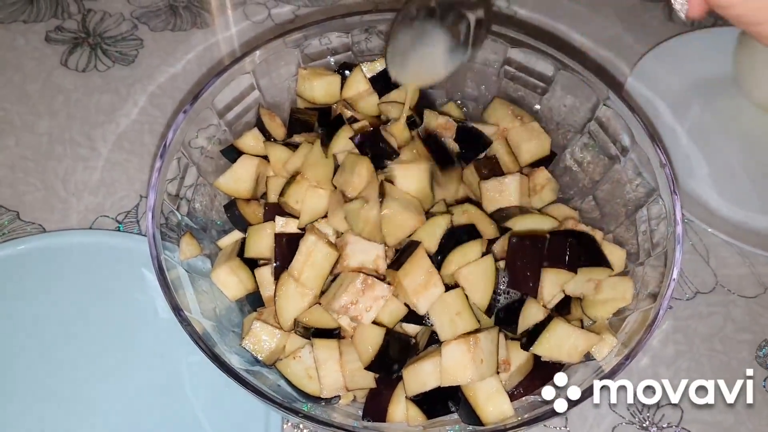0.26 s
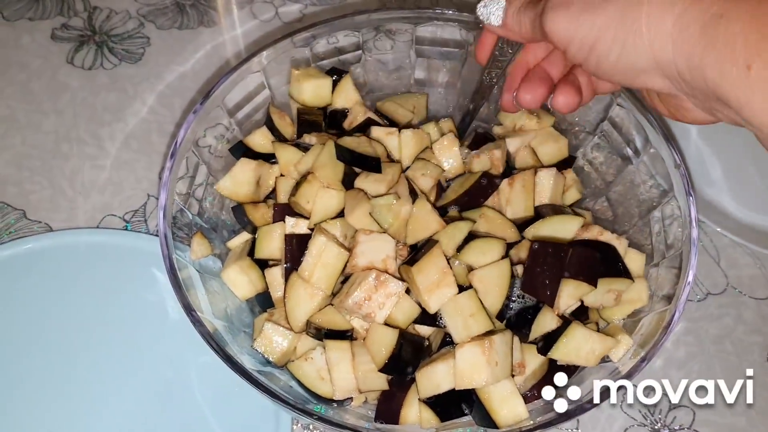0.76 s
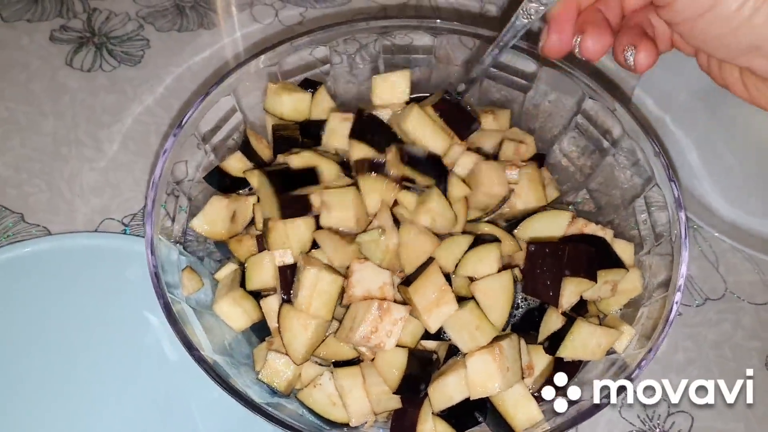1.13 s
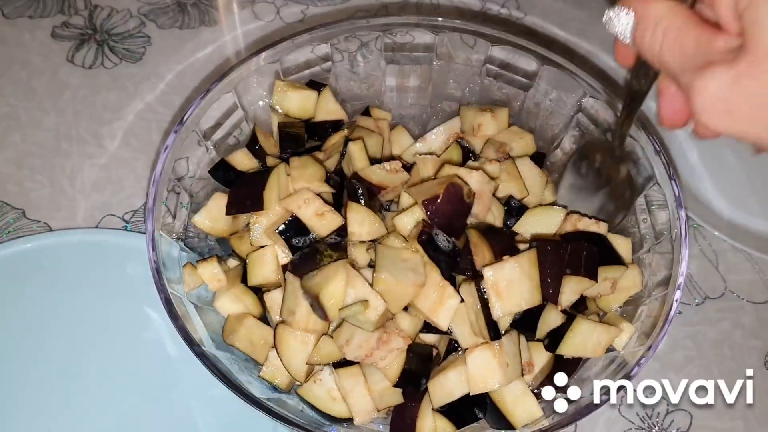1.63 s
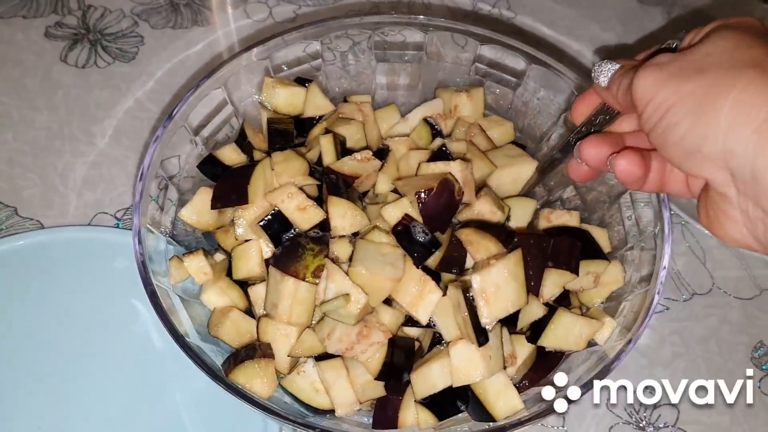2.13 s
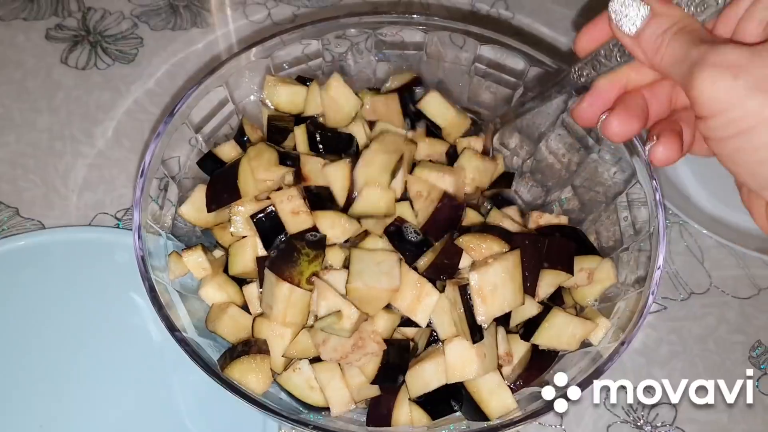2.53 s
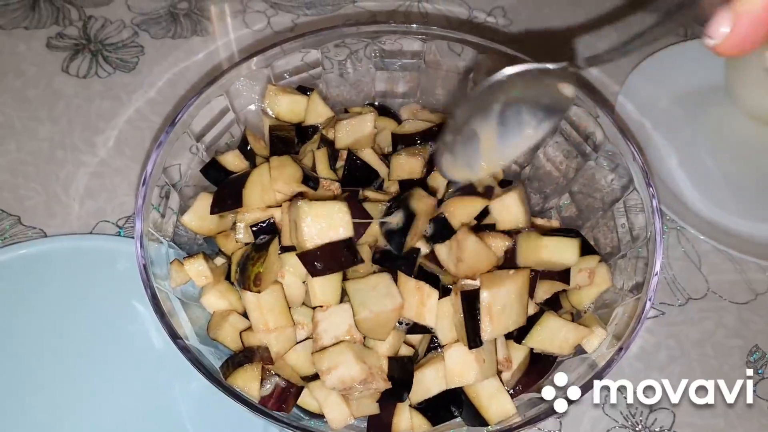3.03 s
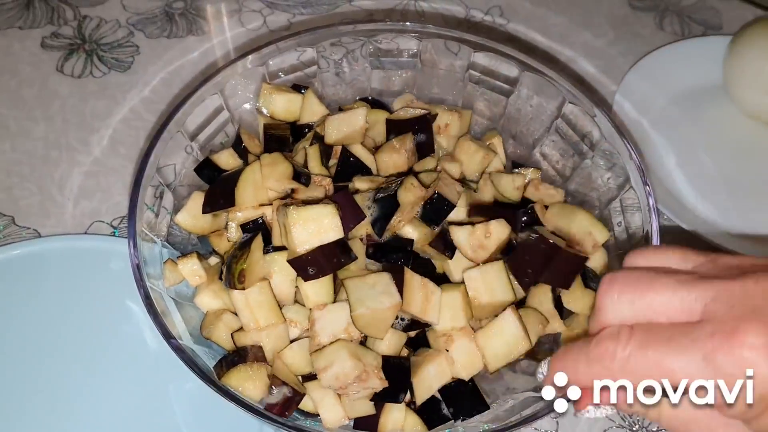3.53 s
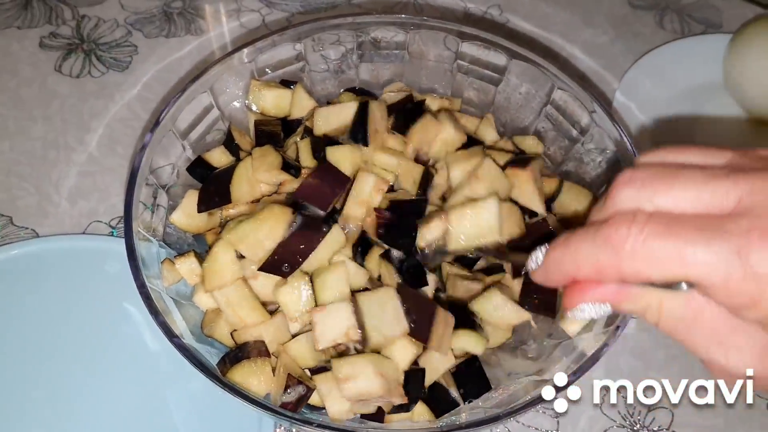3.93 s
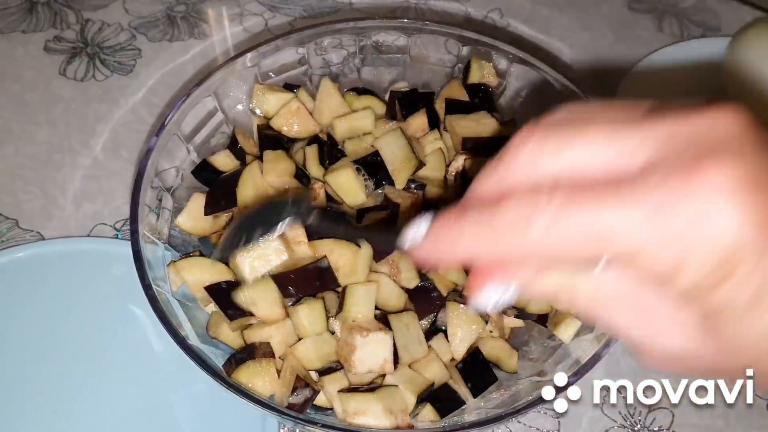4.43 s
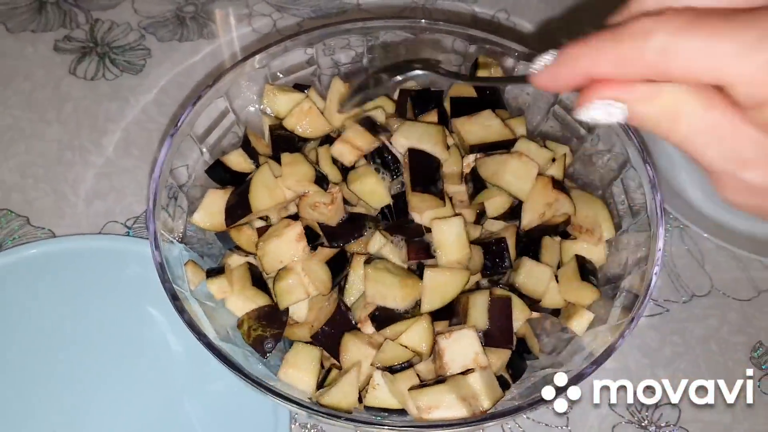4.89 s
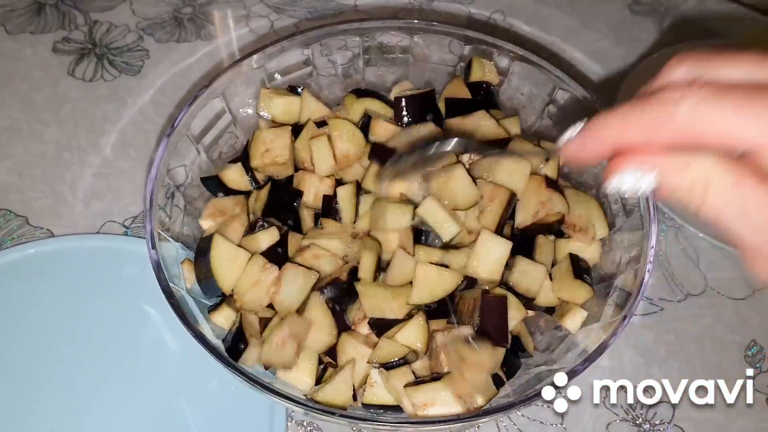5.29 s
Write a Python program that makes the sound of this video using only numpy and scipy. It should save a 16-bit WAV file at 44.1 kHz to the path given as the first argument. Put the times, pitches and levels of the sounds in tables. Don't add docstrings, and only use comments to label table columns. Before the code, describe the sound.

Phone-close stereo capture of stirring: irregular spoon blows on food-damped glass, some bright with a steely edge, some low and heavy, each briefly answered by the room. Moist shuffling, small taps and dropping cubes fill the gaps, busiest around three and a half seconds. After a last medium knock near four and a half seconds, only quiet, wet stirring and faint touches remain over soft hum.

```python
import sys
import numpy as np
from scipy import signal
from scipy.fft import rfft, irfft
from scipy.io import wavfile
from scipy.ndimage import uniform_filter1d

SR = 44100
rng = np.random.default_rng(int(sys.argv[2]) if len(sys.argv) > 2 else 0)


def to_wav(s):
    ch = np.atleast_2d(s).T
    pcm = np.round(np.clip(ch, -1, 1) * 32767)
    wavfile.write(sys.argv[1], SR, pcm.astype(np.int16))


def field_ratio(decibels):
    return 10 ** (np.asarray(decibels, dtype=float) / 20)


N = 244755

# (frequency [Hz], level [dB])
AIR_TONE = [(60, -13.5), (110, -18), (175, -27.5), (300, -30), (520, -15.5), (900, -34.5), (1900, -49.5),
            (2800, -43.5), (4500, -39.5), (6000, -44.5), (7600, -53), (9500, -40.5), (15800, -70.5)]
AIR_DB = -57
# (frequency [Hz], width [Hz], level [dB], steadiness [0-1])
WHINES = [(302, 160, -61.5, 0), (1020, 250, -80, 0.06), (2440, 230, -83.5, .05), (3120, 350, -80, .05),
          (5780, 150, -92.5, 0.1), (14510, 400, -88.5, 0.1)]
# (frequency [Hz], width [Hz], steadiness [0-1])
BOOM_MODES = [(48.6, 3.2, 0.9), (103.7, 36, 0.07)]
# (time [s], level [dB])
DRONE = [(0, -50.5), (.22, -53), (.4, -55.5), (1.2, -64.5), (1.55, -55.5), (2.1, -54.5), (2.55, -52),
         (3, -48.5), (3.3, -52.5), (3.8, -50), (3.9, -51.5), (4.4, -55.5), (4.84, -43.5), (5.15, -58.5),
         (5.4, -50), (5.55, -80.5)]
DRONE_UPPER_DB = -59
# (order [1], level [dB])
SHAFT_ORDERS = [(6, -68), (11, -76), (12, -85), (13, -81), (14, -83), (15, -85), (16, -86), (18, -86),
                (20, -84), (21, -86), (22, -80), (24, -86), (25, -88), (28, -88), (48, -90), (49, -83),
                (50, -93), (51, -92), (53, -94), (61, -92), (62, -88), (63, -86), (64, -89), (65, -84),
                (66, -87), (74, -91), (75, -95), (83, -94), (119, -96)]
SHAFT_HZ, SHAFT_DB, SHAFT_WOBBLE_DB = 48.99, 0, 4

# (time of full effort [s], length [s], cubes sliding [dB], wetness [dB], weight of heap [dB])
STROKES = [(0.144, 0.3, -58, -10.5, 0), (0.621, 0.097, -45, -16.5, 7), (0.963, 0.28, -56, -15.5, 0),
           (1.443, 0.74, -64, -10, 0.5), (1.717, 0.044, -39.5, -13, -1), (1.857, 0.085, -54.5, -10, 12.5),
           (2.153, 0.51, -66, -33, 11), (2.504, 0.83, -64, -11, 3), (3.257, 0.4, -78.5, -25, 23),
           (3.393, 0.06, -37, -17, -5), (3.54, 0.13, -49.5, -15, 0), (3.608, 0.1, -73, -27.5, 5),
           (3.91, 0.17, -60.5, -11, -8), (4.124, 0.33, -62, -8, -1.5), (4.675, 0.18, -55, -6.5, 4),
           (5.073, 0.12, -76.5, -18.5, 0), (5.229, 0.26, -56.5, -8.5, -13), (5.51, 0.81, -79, -10, 25)]
STROKE_RISE, STROKE_FADE_DB = 0.49, -6
HEAP_LAG = 1.17
# (frequency [Hz], level [dB])
SLIDE_TONE = [(500, -34), (800, -5), (1300, -2.5), (2500, -10), (4200, -12), (6000, -23)]
# (frequency [Hz], level [dB])
FIZZ_TONE = [(4000, -32), (6000, 4.5), (7600, 1), (10000, 2.5), (13000, 0.5), (15500, -1.5)]
# (frequency [Hz], level [dB])
HEAP_TONE = [(120, -35.5), (200, 10), (290, 15.5), (450, -10), (700, -16.5)]

# (time [s], level [dB], centre [Hz])
SNAPS = [(0.047, -62, 10600), (0.0992, -61, 12300), (0.126, -46.5, 14000), (0.2114, -56, 9100),
         (0.306, -51, 10100), (1.3622, -42, 6740), (1.417, -64.5, 9400), (1.4412, -44.5, 13660),
         (1.477, -51, 10500), (1.526, -51, 12200), (1.5474, -50, 13400), (2.4613, -50, 12250),
         (3.89, -51, 9700), (3.9597, -64, 9540), (4.0894, -50, 12900), (4.2, -50, 12670),
         (4.23, -60, 12060), (4.2503, -46, 11000), (4.81, -47.5, 7340), (5.2303, -41, 14860)]
# (time [s], level [dB], centre [Hz], wet snap [dB], length [ms])
SCRAPES = [(0.237, -37.5, 1060, -11.5, 6.6), (0.344, -42.5, 1533, -16.5, 3.5), (0.978, -33, 930, -19.5, 23),
           (1.557, -43.5, 1153, -24, 22), (2.133, -35.5, 970, -58, 12), (2.369, -38.5, 2250, -13.5, 12),
           (2.377, -31.5, 1510, -7, 7.9), (2.58, -44, 1105, -12.5, 140), (2.819, -46, 694, -8, 21),
           (3.982, -47, 1157, -18, 20), (4.106, -40.5, 2410, -8.5, 7.6), (5.035, -46, 900, -27, 46),
           (5.055, -42.5, 1094, 4, 26), (5.159, -42.5, 1010, -6, 91), (5.222, -55, 1970, -7, 45),
           (5.521, -45, 1190, -5.5, 68)]

# (time [s], blow [dB], steel crack [dB], room share [dB], clack between modes [dB])
KNOCKS = [
    (0.506, -11, -15, -2.5, -28.5),
    (0.7138, 2, -37, -3.5, -8.5),
    (1.644, -2, -9, -3, -12),
    (1.888, -4, -35, -2.5, -10),
    (3.329, 0, -14.5, -7, -22),
    (3.578, -7.5, -41.5, 1.5, -15),
    (4.576, -8.5, -20.5, -2, -15),
    (5.279, -26.5, -28.5, -5.5, -13),
]
# (frequency [Hz], width [Hz], level [dB])
WALL_SPOTS = [
    [(520, 41, 4), (740, 58, 3.5), (930, 19, 7.5), (1220, 92, 0), (1580, 110, 1.5), (1876, 100, -3.5),
     (2730, 1600, -8), (3846, 170, -12), (4390, 170, -6), (5460, 100, -10.5)],
    [(513.4, 110, 11), (814, 51, 5), (1560, 140, 6.5), (2609, 56, -3.5), (3138, 260, 1.5), (3690, 500, -2),
     (1993, 300, -13), (1200, 200, -15), (946, 53, 5)],
    [(493, 110, 9), (746, 240, 0.5), (1982, 120, -2.5), (2583, 95, -5), (3060, 210, -9.5), (3830, 720, -7),
     (1630, 90, -5), (4340, 84, -12.5), (4830, 75, -18.5)],
    [(413, 180, 1), (719, 37, 6), (1060, 126, -1), (2064, 156, 2), (2400, 140, -6), (2590, 88, -7.5),
     (546, 145, 0), (3300, 290, -10), (4280, 494, -13), (3730, 90.4, -18), (4660, 73, -16),
     (5420, 150, -16.5)],
]
# (frequency [Hz], width [Hz], level [dB])
FLOOR_SPOTS = [
    [(284, 77, -1), (450, 98, 1.5), (1090, 270, 2), (1380, 120.3, -14.5), (1720, 150, 0.5),
     (2470, 160, -16.5), (3030, 250, -24), (3800, 700, -24.5)],
    [(526, 91, 5.5), (735.6, 25, 7.5), (1110, 310, -2.5), (1740, 69, 0.5), (2436, 360, -4.5),
     (3600, 480, -16), (4600, 680, -27)],
    [(264, 36, -1.5), (725, 43, 5.5), (930, 96, -7), (1640, 60, -1), (2160, 86, -9.5), (3020, 205, -19.5),
     (4570, 480, -30.5)],
    [(287, 36, 10), (513, 190, 3), (1060, 110, 5), (1464, 110, -23), (1940, 190, -8), (2380, 59, -12),
     (3920, 300, -30)],
]
# (frequency [Hz], level [dB])
CLACK_TONE = [(120, -26.5), (200, -4.5), (320, 9), (900, 3.5), (2200, 1.5), (4000, -10), (5200, -15.5),
              (7500, -52.5)]
# (frequency [Hz], level [dB])
CRACK_TONE = [(3500, -19), (5300, 1.5), (6100, -1), (7500, -2), (9500, 1.5), (12400, -2.5), (15500, -5),
              (16500, -22.5)]
TAIL_TILT_DB = 0.2
# (frequency [Hz], width [Hz])
SPREAD = [(550, 630), (3200, 2300)]

# (time [s], slow sway [dB], quick thump [dB])
JOLTS = [
    (0.506, -45, -39.5),
    (0.715, -37, -24.5),
    (1.646, -43.5, -35.5),
    (1.888, -38.5, -30.5),
    (2.07, -58.5, -36),
    (2.225, -59.5, -39.5),
    (3.327, -43, -31.5),
    (3.58, -44.5, -31.5),
    (4.573, -52.5, -40.5),
    (5.188, -55, -45),
]
SWAY_S, THUMP_S, THUMP_HZ = 0.072, 0.12, 105

# (time [s], level [dB], t60 [s])
SLIDES_DOWN = [
    (0.511, -39.5, 0.48),
    (1.652, -38, 0.73),
    (3.338, -33.5, 0.48),
    (4.584, -42, 0.29),
]
# (frequency [Hz], width [Hz], level [dB])
RINGS = [
    [(940, 49.9, -1), (1237, 46, -24.5), (1478, 44, -23), (1803, 72, -13), (2990, 170, -14),
     (3650, 44.6, -14), (5080, 29, -16.5)],
    [(490, 33, -5.5), (980, 150, -7), (1570, 71, -13), (2185, 250, -15.5), (2680, 100, -7),
     (2974, 160, -10), (3523, 120, -12.5), (4060, 160, -24.5), (5070, 68, -16)],
    [(526, 30, -3), (737, 19, -6), (900, 47, -5), (1190, 35, -18.5), (1900, 220, -9.5), (2387, 26, -9),
     (3000, 67, -10), (3920, 32, -16), (4420, 56, -15.5), (5120, 87, -19)],
    [(733, 14, -9), (1420, 58, -21), (2050, 72, -6), (2460, 32, -4.5), (2600, 69, -2.5), (3080, 110, -5),
     (4100, 240, -19), (4700, 33, -18.5), (5150, 26, -20.5)],
]
WET_DAMPING_HZ = 110

# (time [s], level [dB], ring [Hz],
# wet snap [dB], ring width [Hz])
GRAZES = [(0.572, -25.5, 1800, -16, 300), (0.696, -28.5, 2600, -29.5, 770), (3.561, -36.5, 1720, -22, 400),
          (4.538, -37.5, 2024, -3, 2524), (1.646, -19, 12500, -30, 3000), (1.631, -56, 12000, -10.5, 6000),
          (5.281, -48, 7700, -29, 6000), (5.288, -52, 4900, -20, 4000), (5.093, -52, 5000, -20, 3000),
          (3.645, -44, 3700, -30.5, 2200), (3.692, -46, 3200, -30, 840)]
# (time [s], level [dB], ring [Hz], wet snap [dB])
TAPS = [(0.67, -23.5, 1300, -14), (0.75, -33.5, 1060, -25.5), (1.166, -43.5, 1060, -14),
        (2.411, -39.5, 1000, -24), (3.1, -45.5, 2094, -8), (3.279, -32.5, 910, -12.5),
        (3.474, -32, 1630, -52), (3.473, -39.5, 3000, -40.5), (3.482, -33.5, 1900, -34),
        (3.481, -29.5, 1900, -24), (3.502, -32.5, 670, -21.5), (3.521, -35.5, 1900, -34),
        (3.511, -30.5, 700, -48.5), (3.647, -27, 916, -60), (3.91, -36.5, 1166, -24),
        (6.4, -46.5, 2000, -34), (5.222, -48, 2380, -11), (1.779, -32, 1490, -20.5),
        (1.814, -35.5, 1050, -14), (3.441, -29, 1900, -34), (3.416, -27, 520, -37), (3.692, -30, 860, -52),
        (3.617, -27, 910, -53)]
TAP_WIDTH_HZ, UPPER_DB, UPPER_PER_SNAP = 360, -18, 0.21
# (time [s], level [dB], ring [Hz])
PLOPS = [(0.58, -27, 1620), (0.695, -8.5, 1090), (0.994, -43, 960), (1.027, -51, 960), (1.047, -47.5, 1270),
         (1.133, -51, 1220), (1.146, -50, 1030), (1.166, -49, 1060), (1.208, -57, 900), (2.132, -42, 756),
         (2.556, -49, 1020), (2.613, -53, 1100), (2.632, -54, 1150), (2.654, -53, 1164), (3.279, -39, 1584),
         (3.401, -32, 756), (3.442, -35, 1830), (3.523, -39, 1630), (3.69, -28.5, 1616), (5.036, -51, 1250),
         (5.05, -50, 1160), (5.056, -49, 1110), (5.063, -58, 1380), (5.074, -56, 1110), (5.119, -62, 1410),
         (5.133, -52, 1020), (5.157, -50.5, 1860), (5.163, -52, 1080), (5.294, -54, 1135),
         (5.315, -52, 1100), (5.402, -56, 1060), (5.518, -50.5, 1170)]
PLOP_T60_S, PLOP_RISE_MS = 0.022, 0.5
# (time [s], pitch [Hz], level [dB])
SQUEAK = [
    (1.85, 930, -57.5),
    (1.853, 930, -35),
    (1.859, 1086, -32.5),
    (1.864, 1145, -36.5),
    (1.868, 1140, -45),
    (1.872, 1140, -43),
    (1.879, 1130, -58.5),
]
FLUTTER_HZ, FLUTTER_RAD = 147, 0.64

# (time [s], level [dB], ring [Hz], push brightness [Hz])
THUDS = [
    (2.072, -35.5, 260.4, 481),
    (2.226, -41, 264, 440),
    (3.196, -59.5, 208, 450),
    (3.514, -46, 339, 522),
    (5.189, -59, 264, 450),
    (5.283, -52.5, 257, 408),
]
# (time [s], level [dB], ring [Hz], push brightness [Hz])
LATE_THUD = (2.374, -47, 255, 400)
FOOT_HZ, TABLE_T60_S = 689, 0.048
TABLE_PAIR, TABLE_PAIR_DB = 1.227, -6.5

# (frequency [Hz], likeness [-1 to 1])
SAME = [(60, .995), (180, .98), (300, .9), (640, .3), (1400, .15), (4000, .06), (15000, .02)]
# (frequency [Hz], right port lag [rad])
LAG = [(400, 0), (560, .2), (720, 1.3), (1000, .6), (1400, .6), (2000, 1.9), (2600, .4), (4000, 1.2),
       (9000, .8)]
# (delay [ms], level [dB])
ECHOES = [(.8, -21.5), (1.6, -16), (2.6, -16.5), (4.5, -20), (7, -21), (9.5, -12.5), (14, -22)]
GAP_HZ, GAP_Q = 4000, 9.9
# (frequency [Hz], t60 [s])
KITCHEN_T60 = [(80, 0.53), (300, 0.33), (1000, 0.4), (3000, 0.42), (7000, 0.55), (15000, 0.25)]
# (frequency [Hz], level [dB])
KITCHEN_TONE = [(80, -11), (300, 1.5), (1000, -5.5), (3000, -4.5), (7000, -0.5), (15000, -5)]
# (frequency [Hz], left minus right [dB])
PORTS = [(60, 1.5), (150, -2.5), (380, -2), (700, -0.5), (1300, 4), (2800, 3), (3850, 6.5), (6000, 4.5),
         (8000, 5.5), (10000, 5), (15000, 17)]
# (frequency [Hz], level [dB])
MIC_EDGES = [(30, -17), (42, 0), (15600, -1.5), (16200, -18), (17200, -55.5)]


def evened(x):
    return x / np.sqrt(np.mean(x ** 2) + 1e-20)


def read(points, hz):
    f, value = np.transpose(points)
    return np.interp(np.log(hz + 1), np.log(f + 1), value)


def likeness(hz, lowest=-1):
    same = np.clip(read(SAME, hz), lowest, 1)
    return same, np.sqrt(1 - same ** 2)


def add(mix, s, sound):
    part = mix[max(round(s * SR), 0):][:len(sound)]
    part += sound[:len(part)]


def curve(rows, column):
    rows = np.array(rows)
    return field_ratio(np.interp(np.arange(N) / SR, rows[:, 0], rows[:, column]))


def swell(rows, rise_s, fall_s, fade_db):
    t = np.arange(0, N + 64, 64) / SR
    u = t - rows[:, :1]
    u = np.where(u < 0, -u / rise_s, u / fall_s)
    power = field_ratio(2 * (rows[:, 1:2] + fade_db * u ** 1.42)).sum(axis=0)
    return np.interp(np.arange(N) / SR, t, np.sqrt(power))


def ring(hz, t60, rise_ms):
    t = np.arange(6000) / SR
    return np.sin(2 * np.pi * hz * t) * field_ratio(-60 * t / t60) * (1 - np.exp(-t * 1000 / rise_ms)) ** 2


def wander(x, width):
    r = np.exp(-np.pi * width / SR)
    once = signal.lfilter([1], [1, -r], x, axis=0)
    return signal.lfilter([1], [1, -r], once, axis=0)


def noise(tone, patchy_db, flicker_db):
    frames, hz = N // 128 + 5, np.fft.rfftfreq(512, 1 / SR)
    a, b, c, d, patches = rng.standard_normal((frames, 257, 5)).T
    patches = uniform_filter1d(patches, size=8, axis=0)
    patches = evened(uniform_filter1d(patches, size=10, axis=1))
    flicker = np.minimum(rng.exponential(1, frames), 3.5) - 1
    same, apart = likeness(hz[:, None])
    left = a + 1j * b
    z = np.array([left, same * left + apart * (c + 1j * d)])
    inside = (hz >= tone[0][0]) & (hz <= tone[-1][0])
    level_db = read(tone, hz)[:, None] + patchy_db * patches + flicker_db * flicker
    z *= inside[:, None] * field_ratio(level_db)
    return evened(signal.istft(z, nperseg=512, noverlap=384)[1][:, :N])


def fuzzy_tone(hz, width, steady):
    same, apart = likeness(hz, lowest=0)
    a, b = rng.standard_normal((N, 2, 2)).T
    z = wander((a + 1j * b).T, width).T
    z = z / abs(z) ** np.clip(steady, 0, 1)
    left, other = (z * np.exp(2j * np.pi * hz * np.arange(N) / SR)).real
    return evened(np.array([left, same * left + apart * other]))


def struck(modes, fill_db, crack_db, tilt_db=0):
    hz = abs(np.fft.fftfreq(4096, 1 / SR))
    power = sum(field_ratio(2 * db) / (1 + (2 * (hz - f) / width) ** 2) ** 1.5 for f, width, db in modes)
    softness = field_ratio(-.1 * (crack_db + 17.5))
    power = power + field_ratio(2 * read(CLACK_TONE, hz * softness) + 2 * fill_db)
    power *= field_ratio(2 * tilt_db * np.log2(np.clip(hz, 300, 5000) / 1000))
    power += field_ratio(2 * (read(CRACK_TONE, hz) + crack_db))
    minimum_phase = np.exp(np.conj(signal.hilbert(np.log(power) / 2)))
    reply = np.fft.ifft(minimum_phase).real[:2048]
    return reply / abs(reply).max()


def background():
    air = field_ratio(AIR_DB - 8) * noise(AIR_TONE, 0.36, .3)
    whines = sum(field_ratio(db) * fuzzy_tone(hz, width, steady) for hz, width, db, steady in WHINES)
    low = np.hypot(curve(DRONE, column=1), sway()) * fuzzy_tone(*BOOM_MODES[0])
    upper = (field_ratio(DRONE_UPPER_DB) + 0.71 * sway()) * fuzzy_tone(*BOOM_MODES[1])
    return air + whines + low + upper + thumps()


def compressor():
    order, db = np.transpose(SHAFT_ORDERS)[:, :, None]
    phase, lag, drift, pace = rng.random((len(order), 4)).T[:, :, None]
    t = np.arange(N) / SR
    breath = np.sin(2 * np.pi * ((0.48 + 1.6 * pace) * t + drift))
    gain = np.sqrt(2) * field_ratio(db + SHAFT_DB + SHAFT_WOBBLE_DB * breath)
    turn = 2 * np.pi * (SHAFT_HZ * order * t + phase)
    left = (gain * np.sin(turn)).sum(axis=0)
    right = (gain * np.sin(turn + 1.8 * (lag - .5))).sum(axis=0)
    return np.array([left, right])


def stirring():
    s, length, db, wet_db, heap_db = np.transpose(STROKES)[:, :, None]
    rise, fall = STROKE_RISE * length, (1 - STROKE_RISE) * length
    slide = swell(np.hstack([s, db]), rise, fall, STROKE_FADE_DB)
    fizz = swell(np.hstack([s, db + wet_db]), rise, fall, STROKE_FADE_DB)
    heap = swell(np.hstack([s, db + heap_db]), HEAP_LAG * rise, HEAP_LAG * fall, STROKE_FADE_DB)
    return slide * noise(SLIDE_TONE, 2.5, 3) + fizz * noise(FIZZ_TONE, 2, 4) + heap * noise(HEAP_TONE, 3.5, 1.5)


def snap(hz, width, t60):
    t = np.arange(512) / SR
    burst = rfft(rng.standard_normal(512) * field_ratio(-60 * t / t60), 1024)
    band = 1 + ((np.fft.rfftfreq(1024, 1 / SR) - hz) / width) ** 4
    burst = irfft(burst / band)[:512]
    return burst / abs(burst).max()


def snaps():
    out = np.zeros(N)
    for s, db, hz in SNAPS:
        add(out, s, field_ratio(db) * snap(hz, 4320, 0.00083))
    return out


def scrape(hz, snap_db, ms):
    slips = rng.standard_normal(3000) ** 3 * np.exp(-np.arange(3000) / SR * 2000 / ms)
    sound = signal.fftconvolve(slips, struck([(hz, 500, 0)], -5.0, snap_db - 9.0))
    return sound / abs(sound).max()


def scrapes():
    out = np.zeros(N)
    for s, db, hz, snap_db, ms in SCRAPES:
        add(out, s, field_ratio(db - 2.5) * scrape(hz, snap_db, ms))
    return out


def dispersed(x):
    for hz, width in SPREAD:
        r = np.exp(-np.pi * width / SR)
        poles = [1, -2 * r * np.cos(2 * np.pi * hz / SR), r ** 2]
        x = signal.lfilter(poles[::-1], poles, x)
    return x


def knocks():
    direct, feed = np.zeros(N), np.zeros(N)
    blows = KNOCKS[::2] + KNOCKS[1::2]
    for (s, db, crack_db, wet_db, fill_db), modes in zip(blows, WALL_SPOTS + FLOOR_SPOTS):
        s += .0016
        add(direct, s, -field_ratio(db + 2.0) * struck(modes, fill_db, crack_db - 10.5))
        spread = [(hz, 1.7 * width, level_db) for hz, width, level_db in modes]
        add(feed, s, field_ratio(db + wet_db) * struck(spread, fill_db + 8.0, crack_db - 4.0, TAIL_TILT_DB))
    return dispersed(direct), feed


def sway():
    s, db, _ = np.transpose(JOLTS)[:, :, None]
    u = np.maximum(np.arange(N) / SR - s, 0) / SWAY_S
    humps = field_ratio(db) * (u * np.exp(1 - u)) ** 1.7
    return np.sqrt((humps ** 2).sum(axis=0))


def thumps():
    out = np.zeros(N)
    for s, _, db in JOLTS:
        add(out, s, field_ratio(db + 9) * ring(THUMP_HZ, THUMP_S, 4.6) * np.hanning(12000)[6000:])
    return out


def ringing():
    out, t = np.zeros((N, 2)), np.arange(SR // 2) / SR
    for (s, db, t60), modes in zip(SLIDES_DOWN, RINGS):
        slips, sound = rng.standard_normal((len(t), 2)) ** 3, 0
        for hz, width, level_db in modes:
            same, apart = likeness(hz, lowest=0)
            turn = np.exp(2j * np.pi * hz * t)[:, None]
            pair = slips @ np.array([[0.59, same], [0, apart]])
            tone = turn * wander(pair / turn, width + WET_DAMPING_HZ)
            sound = sound + field_ratio(level_db) * np.sqrt(width / 50 + 1) * evened(tone.real)
        fade = field_ratio(db - 60 * t / t60) * (1 - np.exp(-t / 0.0014))
        add(out, s, fade[:, None] * sound)
    return out.T


def touches():
    out = np.zeros(N)
    for s, db, hz, snap_db, width in [(*row, TAP_WIDTH_HZ) for row in TAPS] + GRAZES:
        modes = [(hz, width, 0), (3000, 1500, UPPER_DB + UPPER_PER_SNAP * snap_db)]
        add(out, s + 0.00028, field_ratio(db + 3.0) * struck(modes, -12.0, snap_db - 11.5))
    return out


def plops():
    out = np.zeros(N)
    for s, db, hz in PLOPS:
        main = ring(hz, PLOP_T60_S, PLOP_RISE_MS)
        upper = ring(1.55 * hz, 0.55 * PLOP_T60_S, PLOP_RISE_MS)
        add(out, s + 0.0002, field_ratio(db + 4.5) * (main + 0.31 * upper))
    return out


def squeak():
    out = np.zeros(N)
    s, hz, db = np.transpose(SQUEAK)
    t = np.arange(s[0], s[-1], 1 / SR)
    flutter_turn = 2 * np.pi * FLUTTER_HZ * (t - s[0]) ** 1.2 / (s[-1] - s[0]) ** .2
    turn = 2 * np.pi * np.cumsum(np.interp(t, s, hz)) / SR + FLUTTER_RAD * np.sin(flutter_turn)
    tone = np.sin(turn) + 0.34 * np.sin(2 * turn) + 0.05 * np.sin(3 * turn)
    add(out, s[0], field_ratio(np.interp(t, s, db)) * tone)
    return out


def thuds():
    out = np.zeros(N)
    for s, db, hz, push_hz in THUDS + [LATE_THUD]:
        push = field_ratio(db + 18.5) * ring(push_hz, .012, .55)
        foot = field_ratio(db + 3) * ring(FOOT_HZ, .045, .6)
        add(out, s - .0016, -push - foot)
        add(out, s + .0037, field_ratio(db + 17) * ring(hz, TABLE_T60_S, 2.6))
        pair = ring(TABLE_PAIR * hz, 1.2 * TABLE_T60_S, 2.4)
        add(out, s + .0046, field_ratio(db + 13.5 + TABLE_PAIR_DB) * pair)
    return out


def early(x):
    ms, db = np.transpose(ECHOES)
    taps = np.zeros((2, 1000))
    at = ((ms + 0.021 * rng.uniform(-1.4, 1, (2, len(ms)))) * SR / 1000).astype(int)
    np.put_along_axis(taps, at, field_ratio(db) * (-1.) ** np.arange(len(ms)), 1)
    decay = np.exp(-np.arange(1000) / SR / 0.0024)
    scatter = field_ratio(-13.0) * rng.standard_normal((1000, 2)).T * decay
    scatter = signal.lfilter(*signal.iirnotch(GAP_HZ, GAP_Q, SR), scatter)
    low, high = (signal.butter(4, 2600, kind, fs=SR) for kind in ('low', 'high'))
    reply = signal.lfilter(*low, taps) + signal.lfilter(*high, scatter)
    return signal.oaconvolve(x, reply, axes=1)[:, :N]


def kitchen(x):
    hz, t, z = signal.stft(rng.standard_normal((2, SR)), SR, nperseg=512)
    same, apart = likeness(hz[:, None])
    z[1] = same * z[0] + apart * z[1]
    decay_db = read(KITCHEN_TONE, hz)[:, None] - 60 * t / read(KITCHEN_T60, hz)[:, None]
    tail = signal.istft(z * field_ratio(decay_db), SR, nperseg=512)[1]
    tail *= 1 - np.exp(-(np.arange(tail.shape[1]) / SR / 0.0035) ** 2)
    return signal.fftconvolve(x[None], tail / np.linalg.norm(tail[0]), axes=1)[:, :N]


def scene():
    direct, feed = knocks()
    small = snaps() + scrapes() + touches() + squeak()
    low = thuds()
    close = direct + small + plops()
    lag = np.exp(-1j * read(LAG, np.fft.rfftfreq(N, 1 / SR)))
    near = np.array([close, irfft(rfft(close) * lag, N)])
    room = kitchen(feed + field_ratio(-5) * small + field_ratio(-8) * low)
    return near + early(near) + low + room + stirring() + background() + ringing() + compressor()


def top_cut(x):
    return signal.sosfilt(signal.butter(12, 17160, fs=SR, output="sos"), x)


def record(dry):
    hz = np.fft.rfftfreq(N, 1 / SR)
    half = field_ratio(read(PORTS, hz) / 2)
    ports = irfft(rfft(dry) * np.array([half, 1 / half]), N)
    ports = np.tanh(ports / 1.05) * 1.05
    mix = irfft(rfft(ports) * field_ratio(read(MIC_EDGES, hz)), N)
    return top_cut(mix)


dry = scene()
out = record(dry)
to_wav(out)
```